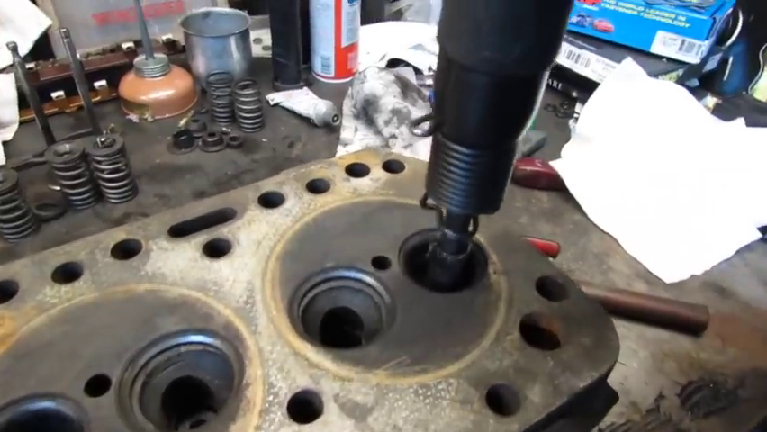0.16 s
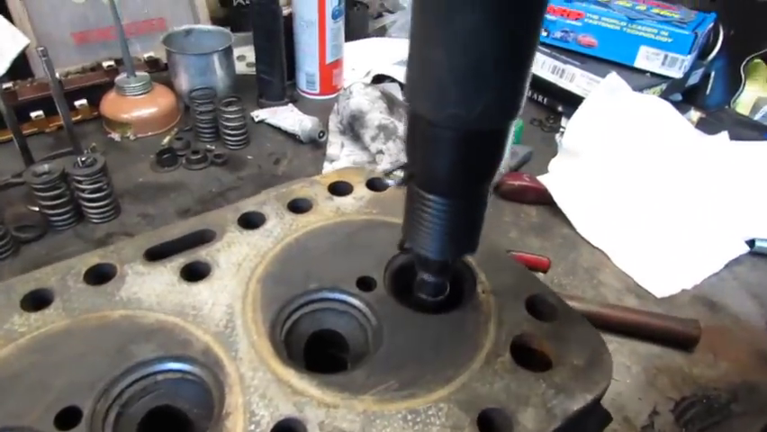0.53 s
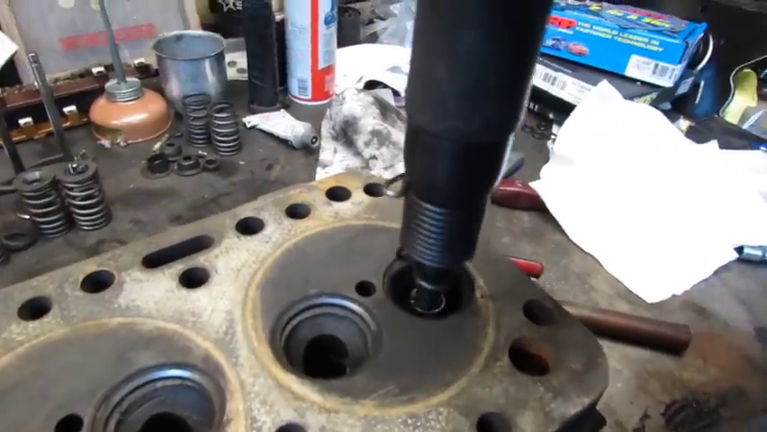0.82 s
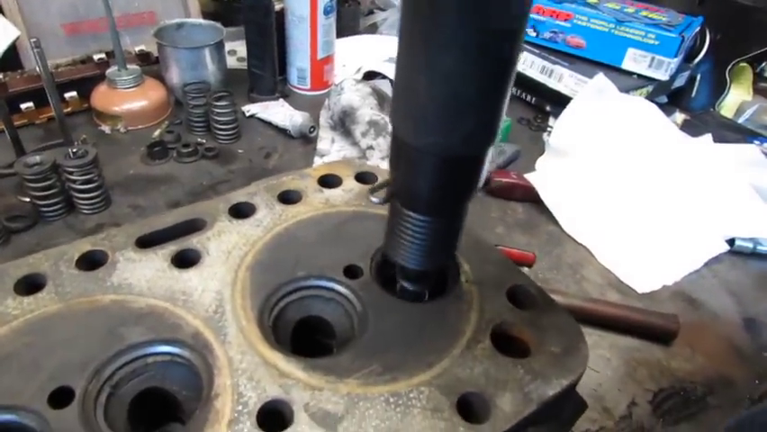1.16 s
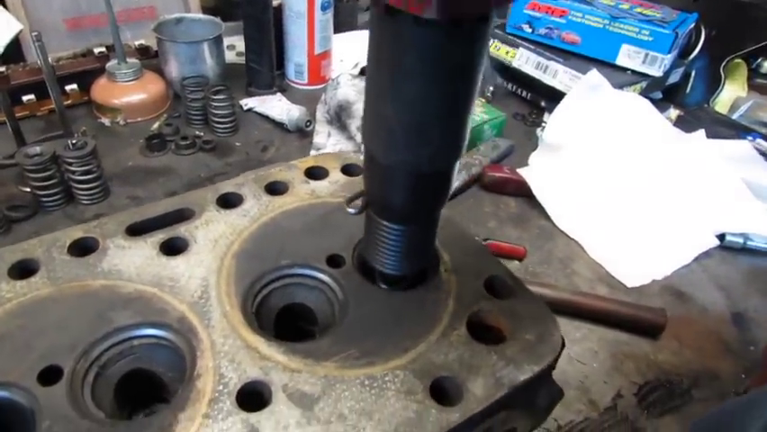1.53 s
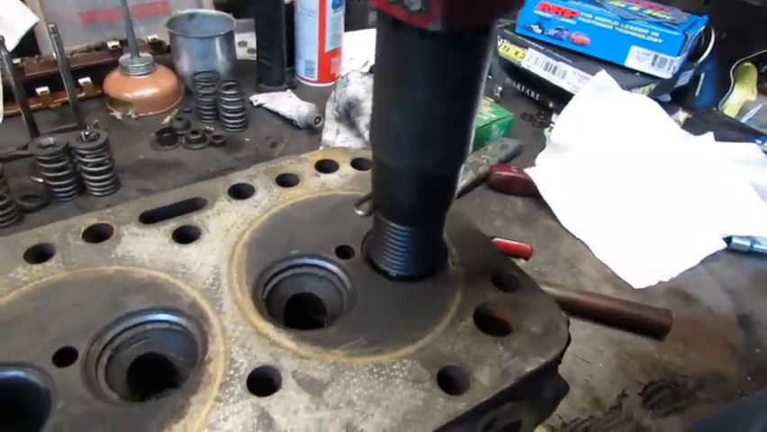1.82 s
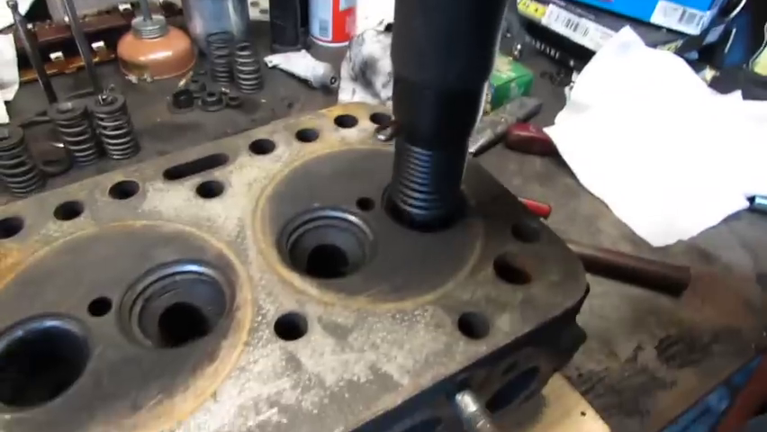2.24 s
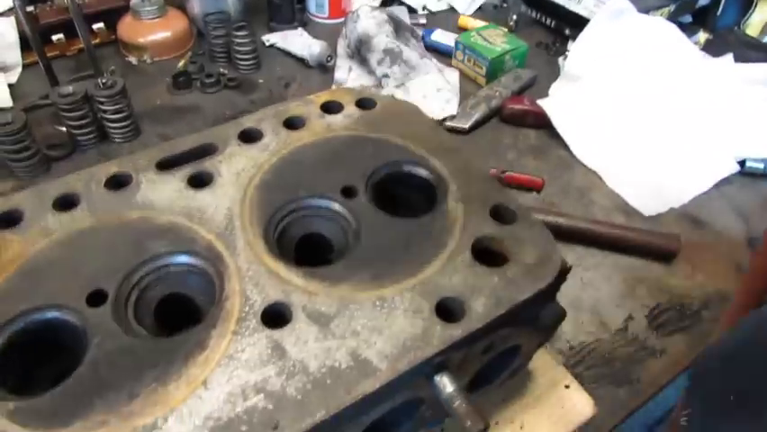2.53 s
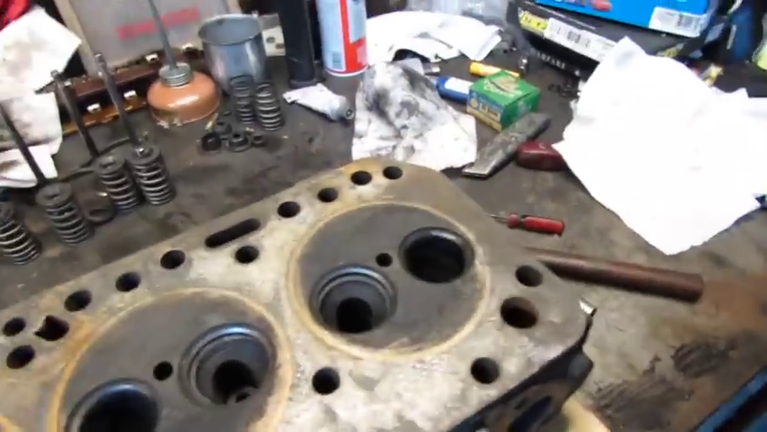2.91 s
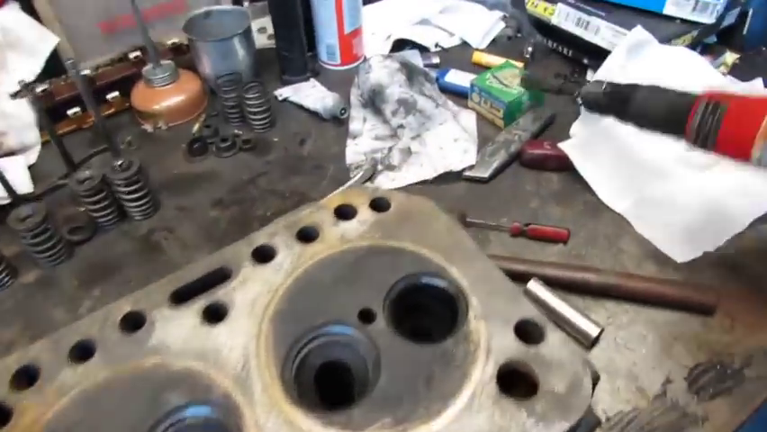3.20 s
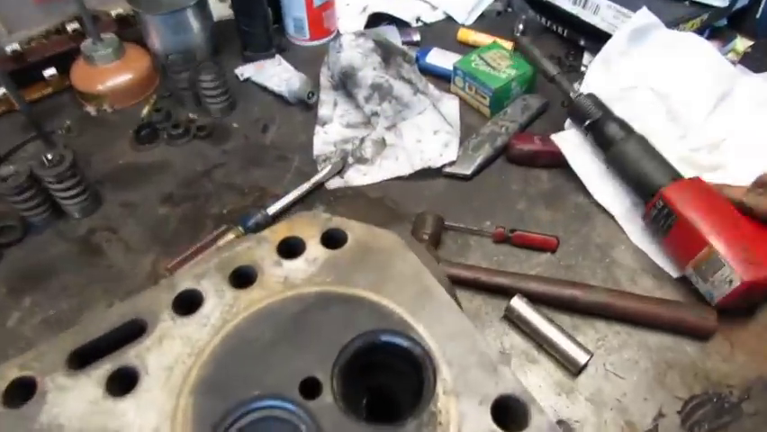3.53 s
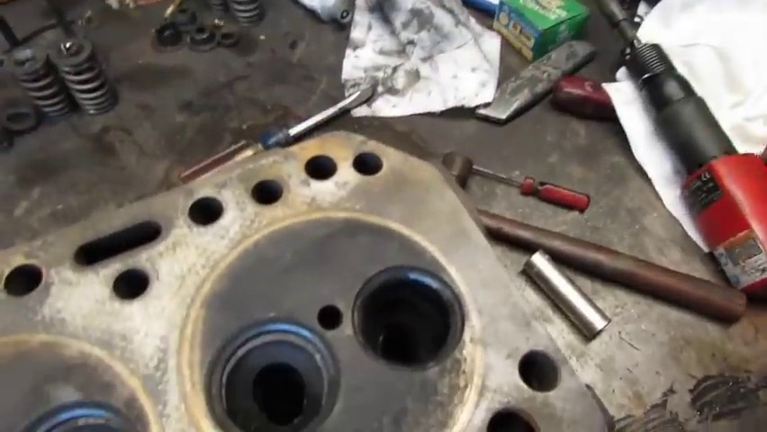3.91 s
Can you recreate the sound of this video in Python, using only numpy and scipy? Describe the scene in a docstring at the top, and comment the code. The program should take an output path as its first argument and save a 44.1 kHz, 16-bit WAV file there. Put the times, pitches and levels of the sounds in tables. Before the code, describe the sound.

Harsh pneumatic hammering on cast iron, hissing exhaust air, a loose metallic clatter and jingle, then quiet and a few bench knocks.

```python
"""Short rattling bursts of an air hammer, then a clatter, jingles and knocks as the tool is laid on a bench.
The hammer drives a valve guide out of a cast-iron cylinder head: piston blows ring the casting and the guide.
Exhaust air is shaped noise that hisses and buffets the microphone; loose parts are noisy hits plus ringing.
Soft hose noises, seeping air, shop noise and a faint tone lie behind, and a small workshop adds its echo."""
import sys
import numpy as np
from scipy import signal
from scipy.fft import rfft, irfft
from scipy.io import wavfile

SR = 44100
rng = np.random.default_rng(int(sys.argv[2]) if len(sys.argv) > 2 else 0)


def output_pcm(signal):
    """Save a mono or channel-first signal as 16-bit PCM at the path in sys.argv[1].

    Samples are clipped to [-1, 1] before scaling.
    """
    pcm = np.clip(np.atleast_2d(signal).T, -1, 1) * 32767
    wavfile.write(sys.argv[1], SR, np.round(pcm).astype(np.int16))


N = 179001
T = np.arange(N) / SR
RING = T[:SR // 2]  # time axis of one struck sound, half a second

# head and chisel ringing together: f/Hz, relative level/dB, time to fall 60 dB/s
CASTING_MODES = [(231, 3.5, 0.13), (376, 4, .08), (598, 2.5, 0.088), (2084, -8, 0.18), (2323, -9, 0.17),
                 (2630, -32.5, 0.088), (2980, -17, 0.081), (3440, -1, 0.12), (4260, -5.5, 0.16),
                 (4400, -14, .08), (6840, -15, .1), (6550, -5, 0.048), (7700, 0, 0.12), (8500, 4, 0.056)]
# tone colour of the exhaust air: f/Hz, relative level/dB
EXHAUST = [(200, -15.5), (700, -6), (1500, -6), (3000, -4.5), (4200, -5), (5400, -0.5), (7200, -0.5),
           (9000, -1.5), (11000, -3.5), (13500, -7.5), (16000, -18)]
# tone colour of the crack of a blow: f/Hz, relative level/dB
CRACK = [(40, -8.5), (120, -8.5), (230, -3.5), (380, 3.5), (620, -8.5), (800, -5.5), (1500, -11),
         (3500, -17.5), (7000, -13.5), (11000, -35), (16000, -47)]


def hammer():
    """While the trigger is held the piston strikes the chisel and vents air once a stroke."""
    # trigger pulls: pressed/s, released/s, relative air level/dB, relative draught level/dB, blow rate/Hz
    bursts = [(0.038, 0.732, -18.5, -25, 37.49), (0.77, 0.77, -14.5, -38, 36.4),
              (0.837, 0.985, -16, -24.5, 35.26), (1.15, 1.277, -14, -21, 35),
              (1.442, 1.547, -15, -24, 34.53), (1.708, 1.814, -14, -23.5, 36.78),
              (2.299, 2.35, -12, -23.5, 37.45)]
    open_s, close_t60_s = 0.0039, 0.085
    squeeze_db_per_s = 3.5  # the flow creeps up while the trigger is held down
    hiss_db, throb_db, rattle_db, draught_db = 1.0, 2.0, -9, 6
    scatter_db, jitter_s = 1.66, 0.0007  # unevenness of the blows in strength and in time
    jet, draught = exhaust_jet(), microphone_draught()
    rattle = noise(CRACK, -0.13)
    out, strikes = np.zeros((2, N)), np.zeros(N)
    for start, stop, air_db, wind_db, piston_hz in bursts:
        held = np.maximum(T - start, 0)
        air = amp(air_db + squeeze_db_per_s * held)
        flow = air * valve(start, stop, open_s, close_t60_s)
        turns = piston_hz * held  # piston strokes so far

        # one blow at the start of each stroke
        strokes = np.flatnonzero(np.diff(np.ceil(turns)) * (T[1:] < stop))
        late, harder = rng.standard_normal((2, len(strokes)))
        moments = strokes + (jitter_s * SR * late).astype(int)
        strikes[moments] += air[strokes] * amp(scatter_db * harder)

        throb = throb_db * np.cos(2 * np.pi * (turns - .2))
        out += flow * amp(hiss_db + throb) * jet
        # between strokes the chisel chatters irregularly in the bore
        out += flow * amp(rattle_db) * np.exp(-(turns % 1) / 3.0) * rattle
        out += valve(start, stop, rise=0.00067, t60=0.0374) * amp(wind_db + draught_db) * draught
    # the same steel path answers every stroke, so the blows buzz at the piston rate
    out += signal.fftconvolve(strikes[None], piston_blow())[:, :N]
    return out + guide_ring(strikes) + air_puffs(jet, draught)


def piston_blow(crack_db=-2, ring_db=-10):
    """One blow: a noisy crack, and the casting and chisel ringing together."""
    crack = noise(CRACK, 0, size=len(RING)) * fade(RING, 0.18)
    return amp(crack_db) * crack + amp(ring_db) * ring(CASTING_MODES, spread=0.87)


def guide_ring(strikes, ring_db=-10.0, chatter_t60=0.07):
    """The chisel chatters on the guide after each blow, so its ring flutters instead of building to a tone."""
    # the guide's own ring while it stands proud of the head: f/Hz, relative level/dB, time to fall 60 dB/s
    guide_modes = [(984, 2.5, 0.14), (1024, 4, 0.15), (1075, 0, 0.06), (2503, -8, 0.11), (3424, -7, 0.11),
                   (5100, -7.5, 0.12), (5250, -5.5, 0.1), (5340, -2, 0.08), (5890, -3, 0.11)]
    # a flat spectrum: f/Hz, relative level/dB
    white = [(20, 0), (16000, 0)]
    sink_s, choke_db_per_s = 1, 28  # sinking into the head then chokes the ring
    contact = fade(RING, chatter_t60)
    contact = signal.fftconvolve(strikes, contact / np.sqrt(np.sum(contact ** 2)))[:N]
    choke_db = choke_db_per_s * np.maximum(T - sink_s, 0)
    push = contact * amp(ring_db - choke_db) * noise(white, 0.32)
    return signal.fftconvolve(push, ring(guide_modes, spread=0.091), axes=1)[:, :N]


def exhaust_jet(grain_db=1.35):
    """Rushing exhaust air: shaped noise with a fine, fast flicker in level."""
    return noise(EXHAUST, 0.4) * amp(grain_db * walk(900))


def microphone_draught(gust_db=4.0, sway_db=2.0):
    """Turbulent exhaust pushes the two microphone ports against each other in quick and slow gusts."""
    # tone colour of the buffeting: f/Hz, relative level/dB
    draught_colour = [(15, -1.5), (35, -0.5), (70, 1), (110, -6), (200, -3), (400, -10.5), (800, -20),
                      (2000, -21), (5000, -40.5)]
    return noise(draught_colour, -0.69) * amp(gust_db * walk(130) + sway_db * walk(22))


def air_puffs(jet, draught, rise_s=0.0012, t60_s=0.048):
    """Short spits of air outside the steady flow, each with a push on the microphone."""
    # puffs: t/s, air level/dB, draught level/dB, both relative to the noise passed in
    puffs = [(0.054, -0.5, -18.5), (0.839, -16.5, -4.5), (1.861, -12.5, -34), (2.288, -23, -48),
             (2.395, -20.5, -17)]
    return sum(valve(s, s, rise_s, t60_s) * (amp(air_db) * jet + amp(wind_db) * draught)
               for s, air_db, wind_db in puffs)


def hard_blows(t60_s=0.043):
    """Single hard blows as the valve opens or shuts: a short crack and the ringing casting."""
    # blows: t/s, level/dB
    blow_times = [(0.053, -11), (0.068, -3.5), (0.7639, -8), (0.834, -18), (0.977, -8.5), (1.54, -9.5),
                  (1.611, -28), (1.853, -17.5), (2.343, -13), (2.386, -20)]
    body = amp(-18.0) * ring(CASTING_MODES, spread=0.31)
    return hits([(s, db, t60_s) for s, db in blow_times], CRACK, likeness=0.24, body=body)


def piston_hoots():
    """A short hollow note as the piston starts or stops: a sine that swells and dies fast."""
    # notes: t/s, f/Hz, peak level/dB
    hoot_notes = [(0.038, 763, -19.5), (1.702, 720, -14.5), (1.853, 612, -16.5), (2.296, 1275, -18),
                  (2.387, 690, -16)]
    return sum(amp(db) * valve(s, s, rise=0.001, t60=0.019) * np.sin(2 * np.pi * hz * T)
               for s, hz, db in hoot_notes)


def falling_guide(t60_s=0.23):
    """The freed guide scrapes out, then lands and bounces under the head."""
    # falls: t/s, level/dB, time between contacts/s, loss at each contact/dB
    drops = [(1.779, -7.5, 0.021, 3.5), (1.916, -20.5, 0.044, 9)]
    # tone colour of the clatter: f/Hz, relative level/dB
    clatter = [(100, -15), (400, -6), (1200, -2.5), (2400, 0.5), (4500, -1), (7000, -5.5), (10000, -12.5),
               (16000, -39)]
    return sum(hits(bounces(s, db, gap, loss_db, t60_s, count=4), clatter, likeness=0.27)
               for s, db, gap, loss_db in drops)


def chisel_clinks(gap_s=0.009, loss_db=6, scrape_t60_s=0.043):
    """The loose chisel jingles, rebounding twice; each clink gets fresh noise and slightly shifted notes."""
    # clinks: t/s, level/dB, level of the ring relative to the clink/dB
    clink_times = [(0.048, -11, -3), (0.074, -3.5, -18), (1.278, -30, -5), (1.73, -7, -8), (2.324, -12, -4),
                   (2.392, -15, -7), (2.467, -28, -1), (2.489, -28.5, -11), (2.542, -34, -17),
                   (2.882, -48, -35), (3.242, -22.5, -22), (3.2967, -38, -28), (3.527, -19.5, -2.5),
                   (3.661, -42, 3)]
    # the chisel rattling in its spring retainer: f/Hz, relative level/dB, time to fall 60 dB/s
    chisel_modes = [(3230, -20, 0.064), (4000, -16, 0.079), (5500, -19, .06), (6860, -4, 0.14),
                    (7280, 1, 0.065), (7140, -14, .09), (7430, 3.5, 0.055), (7960, -11, .06),
                    (8050, -0.5, .06), (8200, -7.5, .06), (8600, -13.5, 0.046), (10900, -11, .04),
                    (13500, -6.5, .05), (13600, -3, .05)]
    # tone colour of the scrape: f/Hz, relative level/dB
    jingle = [(200, -17), (900, -28), (3000, -4), (5000, -6.5), (7500, 3.5), (9500, -10), (11000, -3.5),
              (14000, -10.5), (16000, -29)]
    out = np.zeros((2, N))
    for s, db, ring_db in clink_times:
        contacts = bounces(s, db, gap_s, loss_db, scrape_t60_s, count=3)
        body = amp(ring_db) * ring(chisel_modes, spread=0.63, detune=0.01)
        out += hits(contacts, jingle, likeness=0.71, body=body)
    return out


def tool_set_down():
    """Knocks, buzzes, soft bumps and the rocking hose together, slightly to the right."""
    # knocks of the tool on the bench: t/s, relative level/dB, time for the crash to fall 60 dB/s
    knock_times = [(3.234, -32, 0.16), (3.245, -28.5, 0.066), (3.523, -26.5, 0.26), (3.6545, -13, 0.12),
                   (3.665, -14.5, 0.11)]
    parts = tool_knocks(knock_times) + bench_buzz(knock_times) + grip_bumps() + hose_rocking()
    return parts * amp([[-.8], [.8]])


def tool_knocks(knock_times):
    """The hammer knocks on the bench: a crash of noise, and its housing rings on."""
    # tone colour of the crash: f/Hz, relative level/dB
    bench_crash = [(29, -43), (50, -31), (418, -1.5), (507, -3), (630, -6), (1540, -6), (1660, -5.5),
                   (3030, -13), (7570, -24), (11100, -39), (12300, -55), (13800, -22), (16000, -56)]
    # ring of the housing: f/Hz, relative level/dB, time to fall 60 dB/s
    housing_modes = [(897, 6, 0.11), (1152, -3, 0.11), (1301, 8, 0.14), (1530, -18, 0.26), (1660, -9, 0.3),
                     (1900, -14, 0.26), (2020, -21, 0.31), (2250, -12, 0.24), (2485, 3, 0.15),
                     (3800, -1.5, 0.089), (4380, -9, 0.16)]
    body = amp(-17.5) * ring(housing_modes, spread=0.78)
    return hits(knock_times, bench_crash, likeness=0.52, body=body)


def bench_buzz(knock_times, buzz_db=-24, t60_s=0.43):
    """Loose things on the bench buzz on after each knock, as slowly fading noise."""
    # tone colour of the buzz: f/Hz, relative level/dB
    buzz_colour = [(200, -22), (700, -16), (1200, -3), (1600, 6), (2450, -1), (3100, -23), (4800, -22),
                   (9000, -40)]
    return hits([(s, db + buzz_db, t60_s) for s, db, _ in knock_times], buzz_colour, likeness=.2)


def grip_bumps(t60_s=0.064):
    """The soft grip bumps the bench: a dull thump and the ringing bench top."""
    # bumps: t/s, relative level/dB
    bump_times = [(3.243, -43.5), (3.525, -19.5), (3.654, -30.5)]
    # tone colour of the thump: f/Hz, relative level/dB
    thump = [(30, -27), (90, -4), (160, -10), (250, -7), (340, -6), (430, -8.5), (600, -20), (1000, -40),
             (3000, -21), (8000, -45)]
    # ring of the bench top: f/Hz, relative level/dB, time to fall 60 dB/s
    bench_modes = [(227, 2.5, 0.14), (255, 4, 0.12), (330, -31, 0.042)]
    body = amp(-2.5) * ring(bench_modes, spread=0.11)
    return hits([(s, db, t60_s) for s, db in bump_times], thump, likeness=0.83, body=body)


def hose_rocking(loss_db=2, t60_s=0.26):
    """The hose rocks to rest: low rumbles, each bouncing twice and weakening."""
    # rumbles: t/s, relative level/dB, time between bounces/s
    rocking = [(3.555, -36.5, 0.029), (3.71, -42, 0.06)]
    # tone colour of the rumble: f/Hz, relative level/dB
    rumble = [(30, -7), (90, 3), (170, -2), (320, -6), (600, -26), (2000, -50), (8000, -67)]
    return sum(hits(bounces(s, db, gap, loss_db, t60_s, count=3), rumble, likeness=0.81)
               for s, db, gap in rocking)


def hose(grain_db=4):
    """Soft, grainy swells of hiss as the hose slides when the tool is moved aside."""
    # swells: t/s, level before the grain/dB, half length/s, strongest f/Hz
    rustles = [(3.026, -51.5, 0.03, 6400), (3.105, -56.5, 0.035, 1900), (3.494, -58, 0.045, 8000)]
    swells = np.zeros((2, N))
    for s, db, half, hz in rustles:
        colour = [(hz / 4, -10), (hz, 0), (hz * 2, -11), (hz * 8, -35)]
        swells += amp(db) * np.exp(-((T - s) / half) ** 2) * noise(colour, 0.286)
    return swells * amp(grain_db * walk(180))


def air_leak():
    """Air seeping from the tool: steady hiss, fainter as the tool is taken away."""
    # points joined by lines: t/s, level/dB
    leak_level = [(0, -41), (2.27, -53.5), (2.9, -61), (4.06, -66)]
    return amp(curve(leak_level)) * noise(EXHAUST, 0.13)


def faint_tone(tone_hz=726):
    """A faint sine whose level rises and falls and whose pitch wavers slightly."""
    # points joined by lines: t/s, rms level/dB
    tone_level = [(0, -49), (2.25, -64.5), (2.68, -75), (2.95, -61), (3.45, -59), (4.06, -81)]
    phase = 2 * np.pi * np.cumsum(tone_hz + 0.6 * walk(16)) / SR
    return np.sqrt(2) * amp(curve(tone_level)) * np.sin(phase)


def shop_noise(level_db=-57.5):
    """Low background noise of the shop, wandering a little in level."""
    # tone colour of the shop: f/Hz, relative level/dB
    shop_colour = [(15, -52), (25, -22.5), (82, -1.5), (166, -14), (200, -6), (591, -10), (659, -14.5),
                   (714, -12.5), (1040, -23.5), (2910, -18.5), (3820, -22.5), (11900, -38), (16000, -36)]
    return amp(level_db + 0.86 * walk(4.55)) * noise(shop_colour, 0.62)


def room(x, wet_db=-13, t60_low=0.38, t60_high=0.25, split_hz=5000):
    """A small cluttered workshop: a diffuse tail whose treble dies first."""
    tail = noise([(30, -8), (200, -4.0), (2000, 0.5), (7000, 8), (16000, 3.5)], 0, size=len(RING))
    low = signal.sosfilt(signal.butter(2, split_hz, fs=SR, output="sos"), tail)
    tail = low * fade(RING, t60_low) + (tail - low) * fade(RING, t60_high)
    tail *= 1 - fade(RING - .004, 0.018)  # silent for 4 ms, then builds up
    tail /= np.sqrt(np.sum(tail ** 2) / 2)
    return x + amp(wet_db) * signal.fftconvolve(x, tail, axes=1)[:, :N]


def amp(db):
    """Decibels to gain."""
    return 10 ** (np.asarray(db) / 20)


def unit(x):
    """Scale to rms 1."""
    return x / np.sqrt(np.mean(x ** 2))


def noise(spectrum, likeness, size=N):
    """Two channels of coloured noise; likeness is their correlation."""
    hz, db = np.transpose(spectrum)
    gain = amp(np.interp(np.log(np.fft.rfftfreq(size, 1 / SR) + 1), np.log(hz), db))
    mid, side = irfft(rfft(rng.standard_normal((2, size))) * gain, size)
    return unit(np.sqrt(1 + likeness) * mid + np.sqrt(1 - likeness) * np.array([side, -side]))


def walk(rate):
    """Random wandering of rms 1: rate new values a second, joined by lines."""
    return unit(np.interp(T * rate, np.arange(N // 10), rng.standard_normal(N // 10)))


def curve(rows):
    """Join (s, value) rows by straight lines."""
    return np.interp(T, *np.transpose(rows))


def fade(t, t60):
    """Exponential decay, 60 dB in t60 seconds."""
    return np.exp(-np.log(1000) * np.maximum(t, 0) / t60)


def valve(start, stop, rise, t60):
    """Air flow that builds up until start, holds, and dies after stop."""
    return np.exp(np.minimum(T - start, 0) / rise) * fade(T - stop, t60)


def ring(modes, spread, detune=0):
    """Decaying sines with a random phase in each channel; detune shifts their pitch a little by chance."""
    phases = spread * rng.standard_normal((len(modes), 2, 1))
    shifts = 1 + detune * rng.standard_normal(len(modes))
    return sum(amp(db) * fade(RING, t60) * np.sin(2 * np.pi * hz * shift * RING + phase)
               for (hz, db, t60), phase, shift in zip(modes, phases, shifts))


def add(out, s, sound):
    """Mix a sound in at time s."""
    i = int(s * SR)
    out[:, i:i + sound.shape[1]] += sound[:, :N - i]


def hits(events, spectrum, likeness, body=0):
    """Each hit is a dense, dying crash plus the ring of the struck body."""
    out = np.zeros((2, N))
    for s, db, t60 in events:
        crash = noise(spectrum, likeness, size=len(RING)) * fade(RING, t60)
        add(out, s, amp(db) * (crash + body))
    return out


def bounces(s, db, gap, loss_db, t60, count, unevenness=.12):
    """A contact and its rebounds, each weaker than the last: rows (s, dB, t60 s)."""
    gaps = gap * np.exp(unevenness * rng.standard_normal(count))
    return [(s + gaps[:k].sum(), db - k * loss_db, t60) for k in range(count)]


def limiter(x, knee_db=-12, follow_s=0.0018):
    """Fast gain control that evens out whatever is louder than the knee."""
    keep = np.exp(-1 / (follow_s * SR))
    power = signal.lfilter([1 - keep], [1, -keep], np.mean(x ** 2, axis=0))
    return x / np.sqrt(np.hypot(1, power / amp(knee_db) ** 2))


def scene():
    """Tool and bench echo in the workshop; leak, tone and shop noise are added without echo."""
    loose_parts = hard_blows() + chisel_clinks() + piston_hoots() + falling_guide()
    workshop = room(hammer() + loose_parts + tool_set_down() + hose())
    return workshop + air_leak() + faint_tone() + shop_noise()


def record(dry, drive=0.24, top_hz=15900):
    """Hold the bursts down, round the highest peaks and cut everything above top_hz steeply."""
    rounded = np.tanh(drive * limiter(dry)) / drive
    return signal.sosfilt(signal.ellip(10, .2, 80, top_hz, fs=SR, output="sos"), rounded)


dry = scene()
out = record(dry)
output_pcm(out)
```